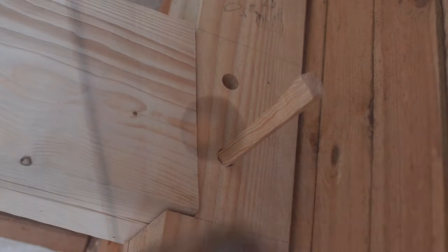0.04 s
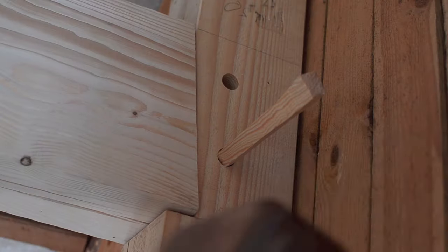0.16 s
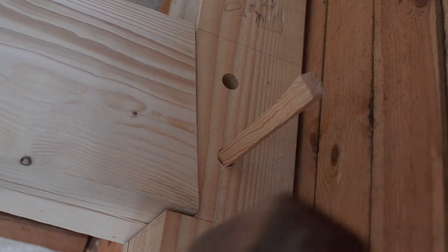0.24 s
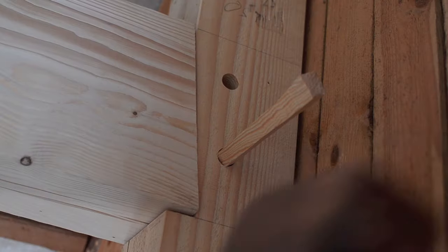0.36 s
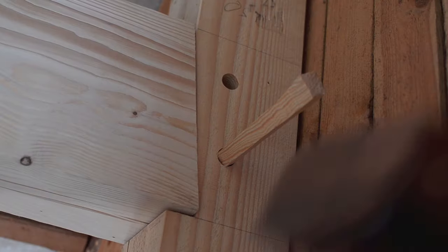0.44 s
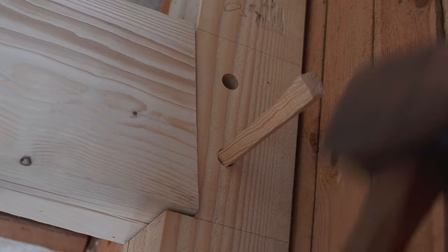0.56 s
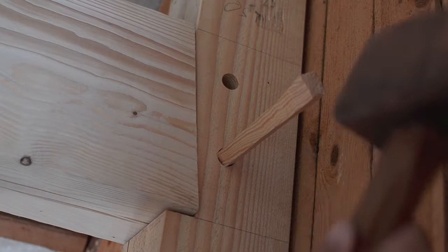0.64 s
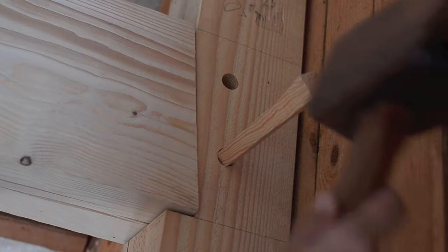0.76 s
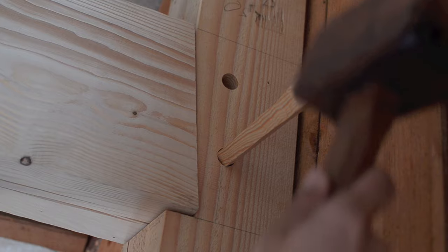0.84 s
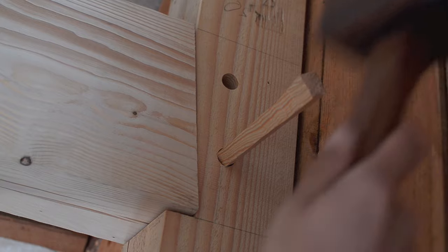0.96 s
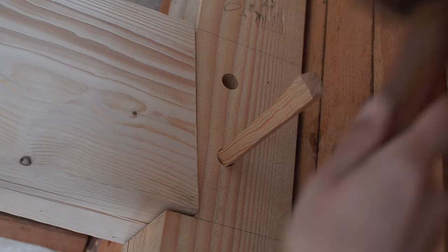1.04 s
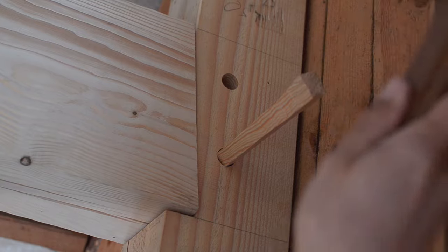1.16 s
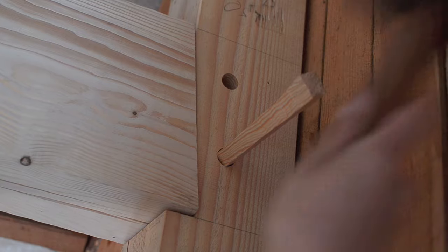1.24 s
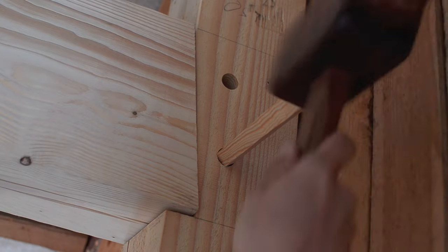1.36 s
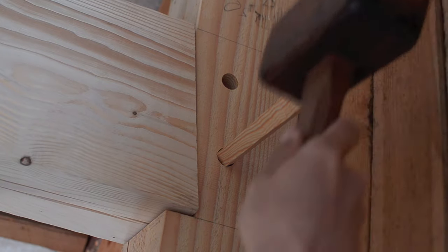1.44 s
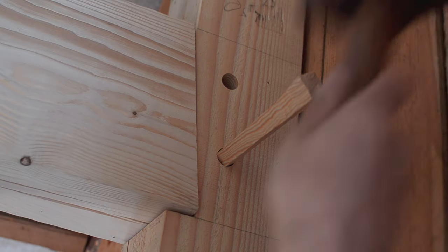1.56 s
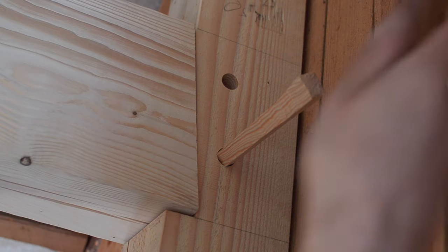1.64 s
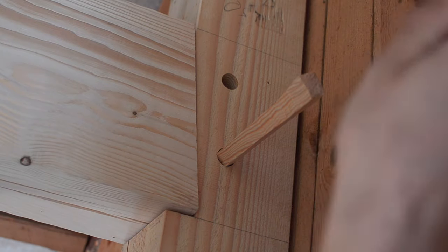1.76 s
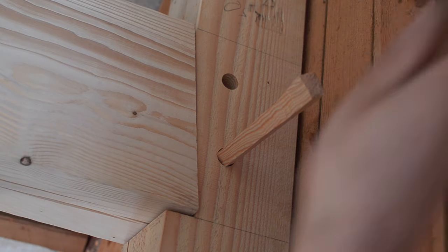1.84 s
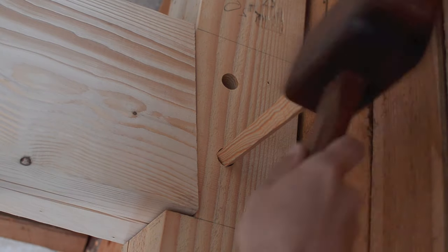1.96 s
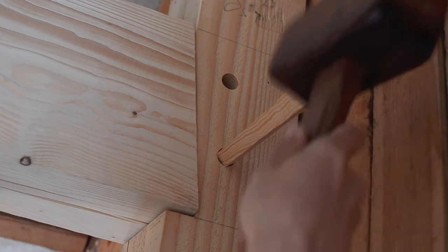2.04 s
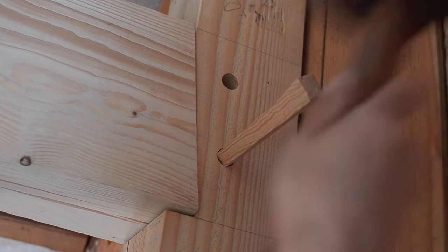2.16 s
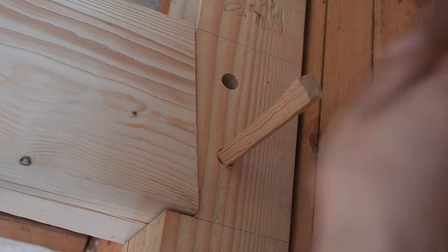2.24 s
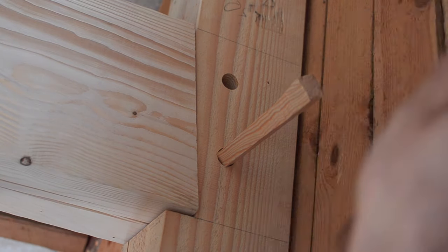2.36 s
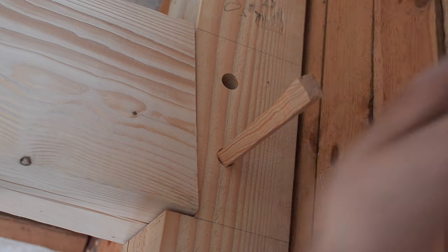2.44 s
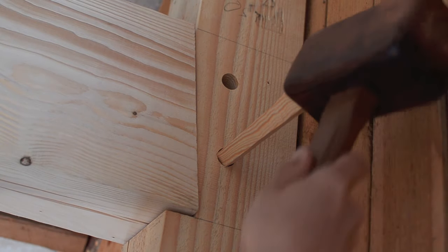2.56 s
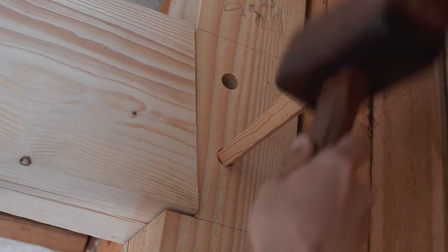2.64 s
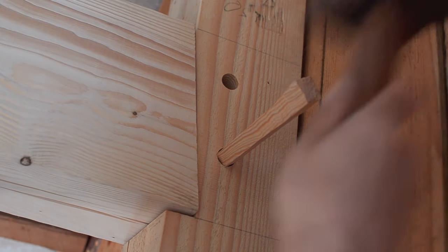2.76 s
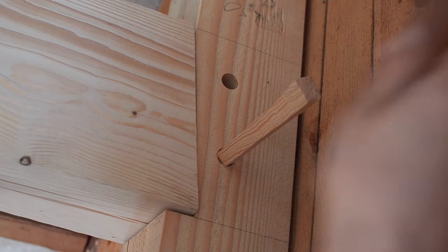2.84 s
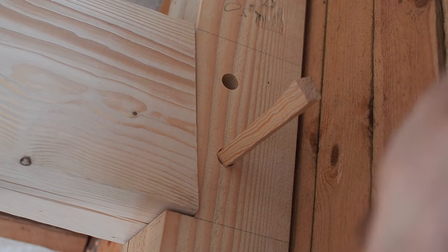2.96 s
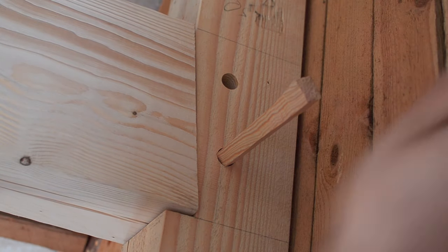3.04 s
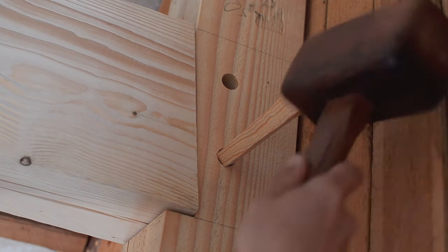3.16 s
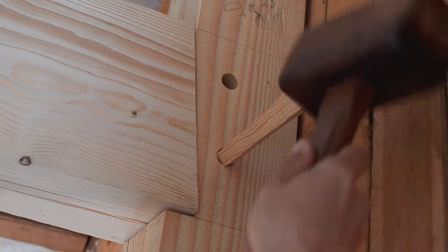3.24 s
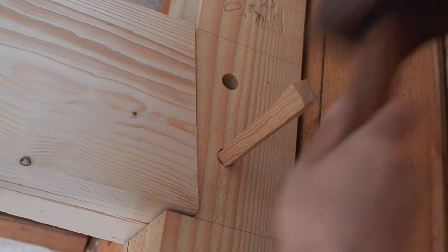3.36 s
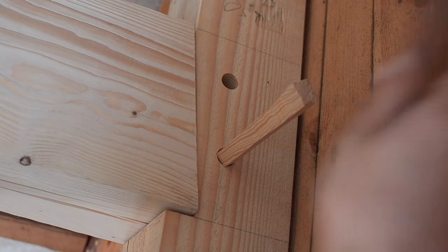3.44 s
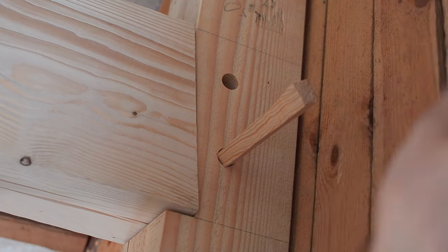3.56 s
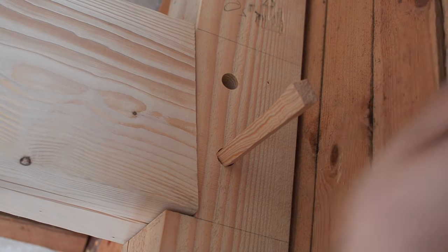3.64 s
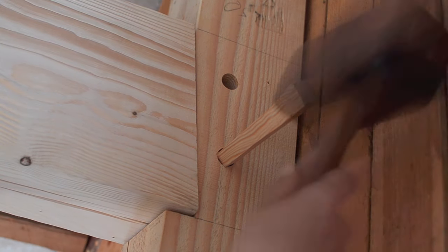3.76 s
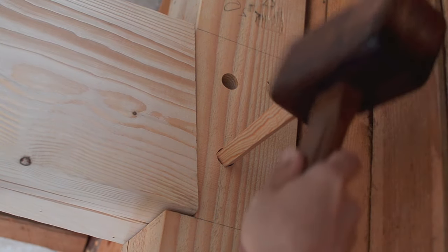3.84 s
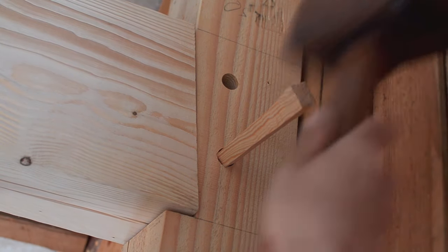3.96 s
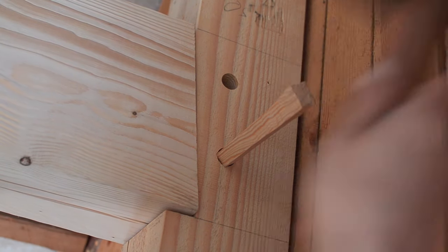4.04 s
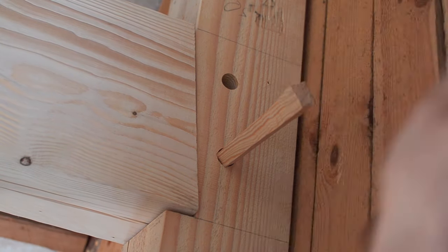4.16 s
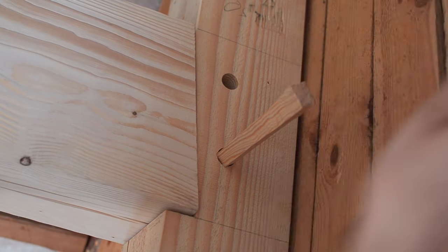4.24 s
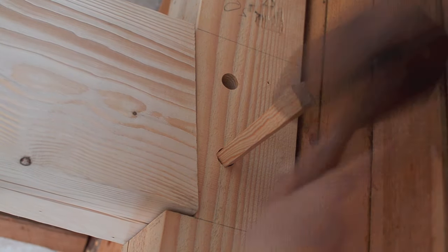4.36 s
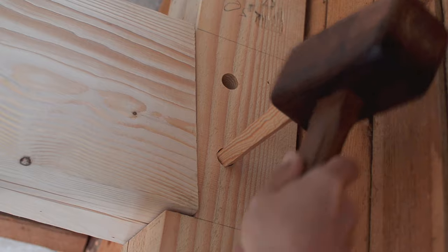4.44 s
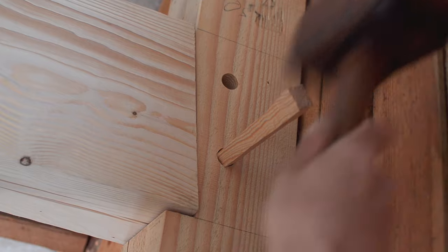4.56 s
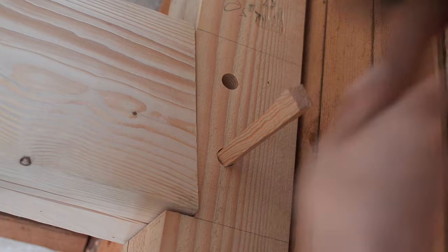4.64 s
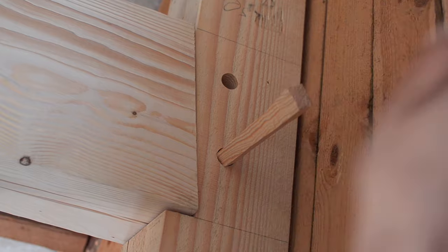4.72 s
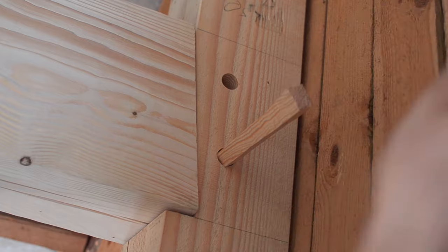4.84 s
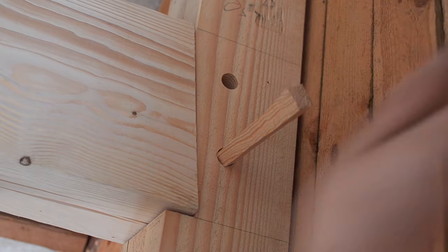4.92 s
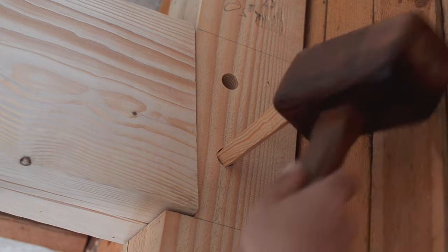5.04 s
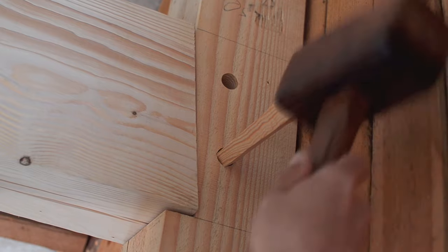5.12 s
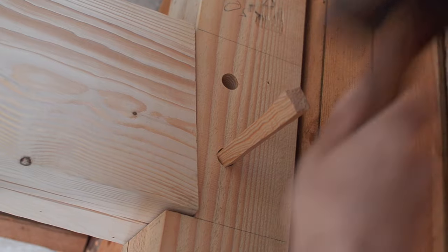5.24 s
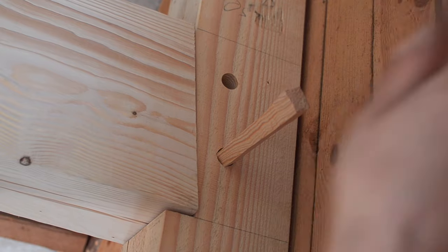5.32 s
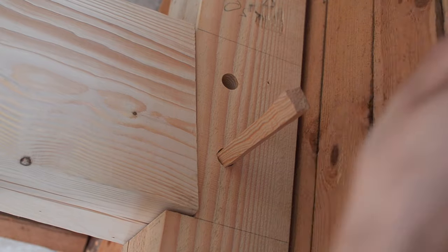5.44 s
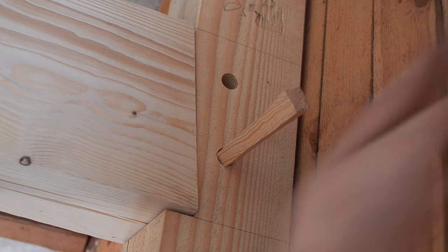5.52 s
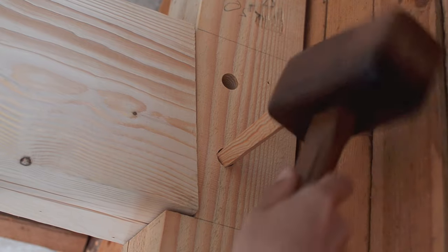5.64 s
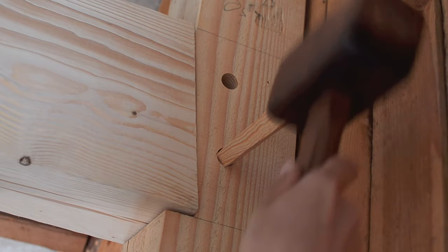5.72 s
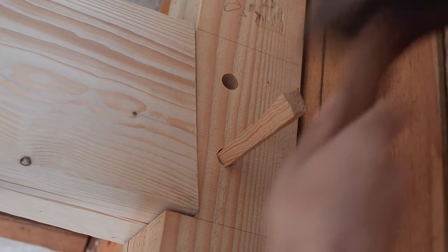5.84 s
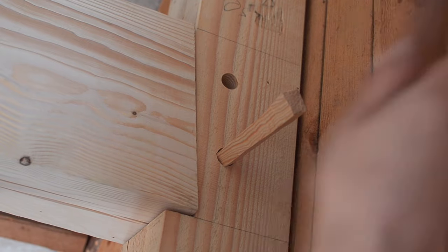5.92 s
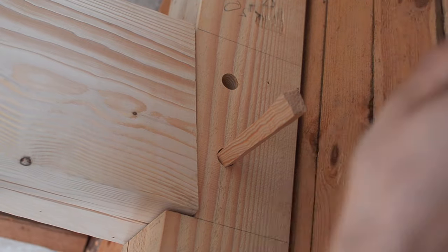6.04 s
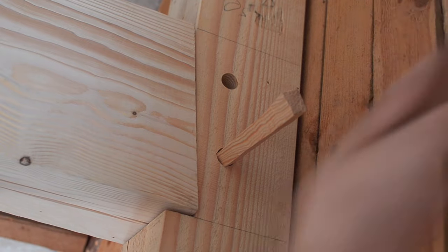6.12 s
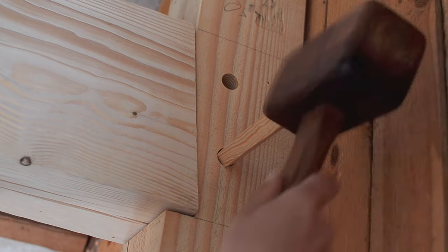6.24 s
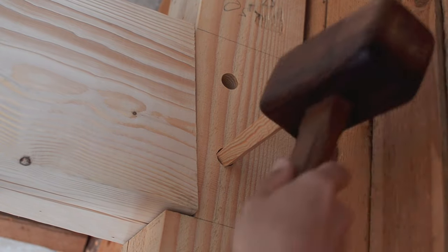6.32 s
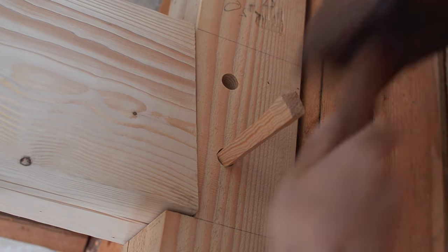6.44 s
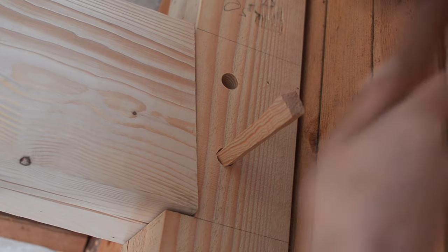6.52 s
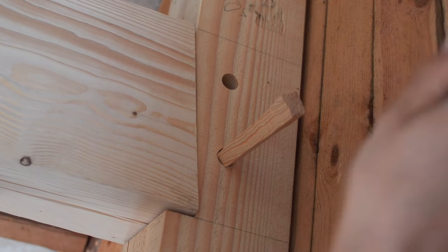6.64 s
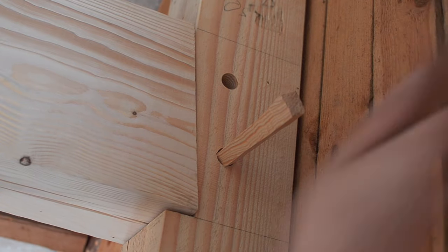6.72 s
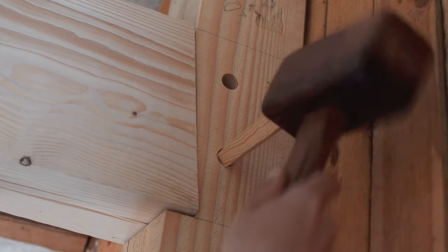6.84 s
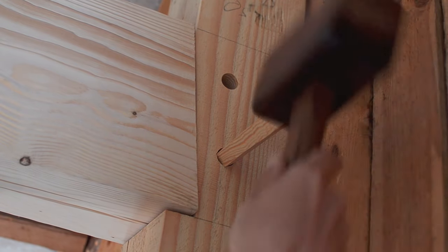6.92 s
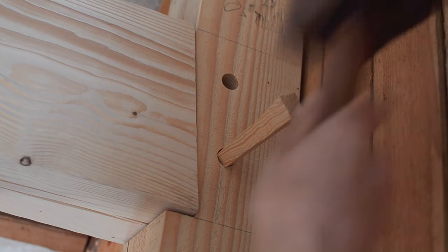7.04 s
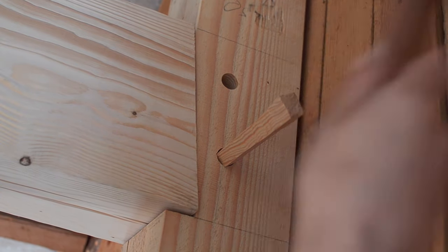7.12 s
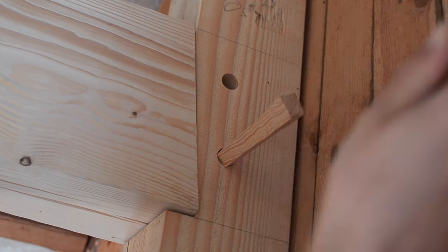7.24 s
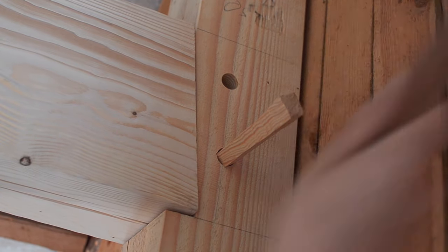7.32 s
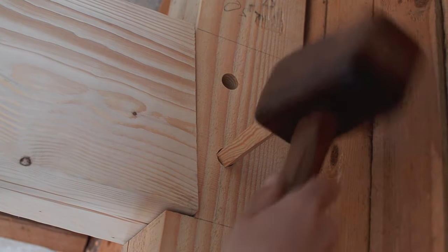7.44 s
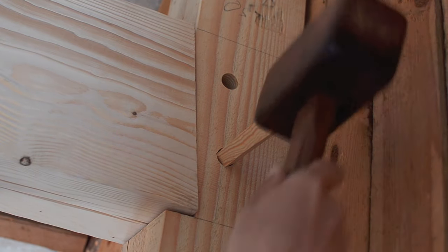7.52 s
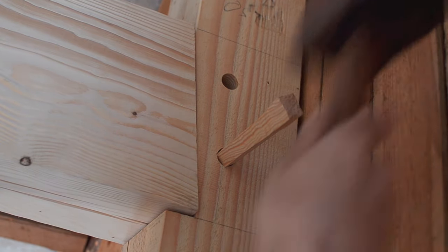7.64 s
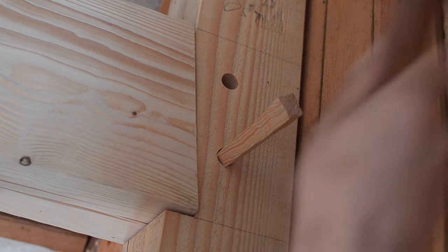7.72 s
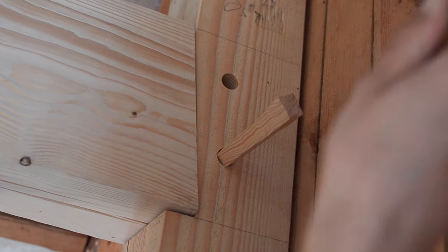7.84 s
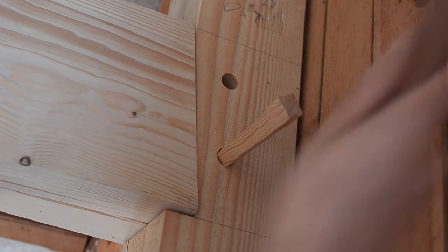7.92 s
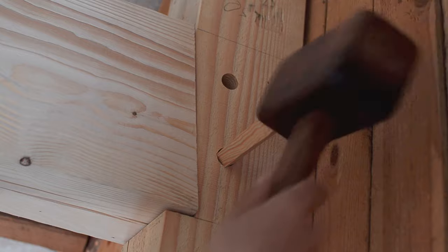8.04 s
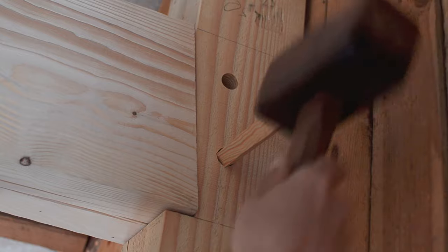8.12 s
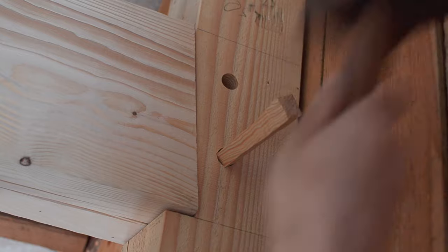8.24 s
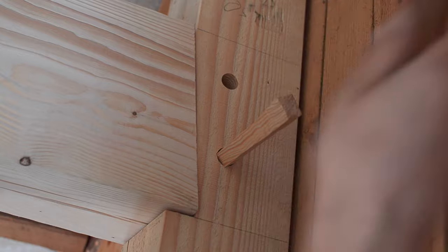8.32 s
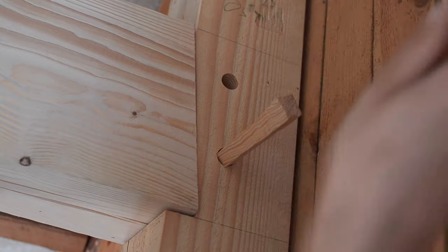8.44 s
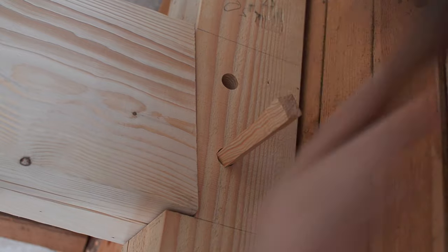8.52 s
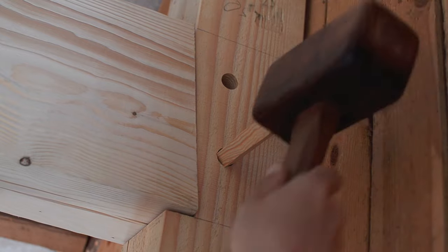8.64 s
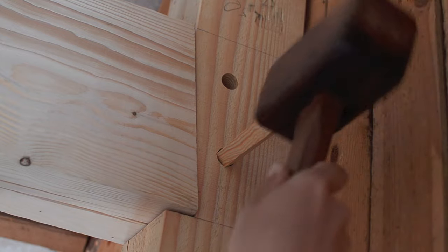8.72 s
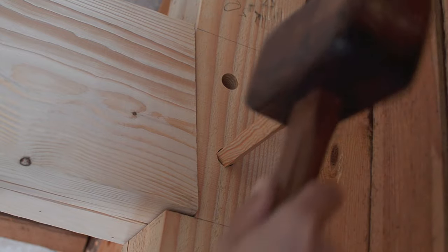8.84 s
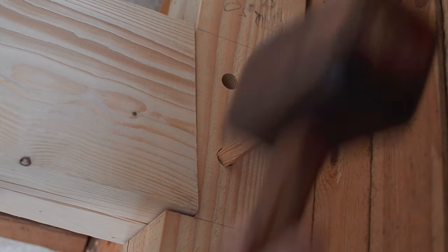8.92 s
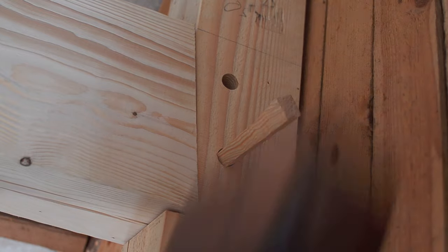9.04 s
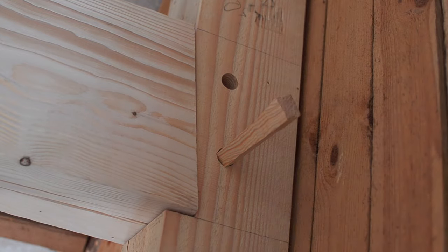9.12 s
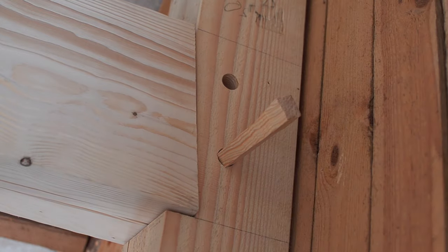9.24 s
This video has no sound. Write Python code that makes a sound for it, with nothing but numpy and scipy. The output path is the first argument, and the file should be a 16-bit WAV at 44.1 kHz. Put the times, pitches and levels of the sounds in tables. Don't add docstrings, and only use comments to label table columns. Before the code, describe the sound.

After more than a second of quiet room tone and faint cloth rustle, a wooden mallet strikes a peg thirteen times at an even pace. Each blow is a hard, very short woody crack, close and slightly overloaded, with a little fibre crunch. A big bare hall answers with the same reverberant tail, soft wall slaps and a late low boom.

```python
import sys
import numpy as np
from scipy import signal
from scipy.io import wavfile

SR = 44100
rng = np.random.default_rng(int(sys.argv[2]) if len(sys.argv) > 2 else 0)


def convert_level_to_amplitude(level_db):
    exponent = np.asarray(level_db, float) / 20
    return 10 ** exponent


def persist_wave(psi):
    counts = np.round(np.clip(psi, -1, 1) * 32767).astype(np.int16)
    wavfile.write(sys.argv[1], SR, np.atleast_2d(counts).T)


N = 409248

STRIKE_TIMES = [1.3788, 2.0118, 2.5999, 3.2137, 3.8341, 4.4398, 5.0648, 5.6555, 6.2761, 6.8611, 7.4600,
                8.0770, 8.6419]
# (strength into the hall [dB], bite [-1 loose to 1 tight], glance off the peg's axis [dB],
# crack of the mallet face [dB])
BLOWS = [(-5, 0.84, -1, 4), (-2, -.1, -0.5, -1.5), (-0.5, -0.82, -4.5, -5.5), (-2, -1.4, -3.5, -1),
         (-1, -0.42, -3, -2), (-3, -.6, 1.5, 0.5), (-1.5, -1.5, 1.5, -1.5), (-3, 0.28, 2, 3),
         (0, 0.19, 2.2, -1), (-0.5, 0.34, -2, 0), (-0.5, .6, 0, 1), (0, 0.32, -0.8, 1), (-1, 1.1, -1.8, 2)]

BEAM_MODES = [(218.1, -12, 0.041), (300.6, -16, 0.063), (368, -7, 0.018), (786, -23, 0.0094)]
# (frequency [Hz], level [dB], t60 [s])
PEG_MODES = [(150, -18, .037), (455, -13, 0.036), (508, -8.5, .04), (956, -7.5, 0.016), (1147, 3, 0.014),
             (1185, 6.5, 0.01)]
# (frequency [Hz], level [dB], t60 [s])
SIDEWAYS_MODES = [(1314, -5, 0.024), (1443, -2, 0.0083)]
# (frequency [Hz], level [dB], t60 [s])
CRACK_MODES = [(1659, -5, 0.013), (1707, -2, 0.01), (1857, -2.5, 0.0098), (2174, 10, 0.0051),
               (3190, -4, 0.0069), (4310, -8.5, 0.0081), (5700, -18.5, 0.0013), (7000, -9.5, 0.0018)]
# (frequency [Hz], level [dB], t60 [s])
FRAME_MODES = [(406.6, -8, 0.065), (594, -17, 0.054), (757, -13, 0.035), (862, -14, 0.06),
               (1890, -13, 0.005), (2630, -9, 0.017)]

# (delay [s], left level [dB], right level [dB])
NEAR_ECHOES = [
    (.0037, -16.5, -21.5),
    (.0088, -20.5, -16),
    (0.0136, -26, -18.5),
]
# (frequency [Hz], t60 [s], build-up [s], colour [dB], left-right likeness [0-1])
HALL_BANDS = [(105, 1, 0.043, -9.5, 0.9), (192, 1.4, 0.015, 3.5, 0.86), (285, 0.96, 0.023, 0.5, 0.63),
              (590, 0.87, 0.024, 5.5, .82), (1200, 0.65, 0.03, 5.5, 0.85), (2800, 0.47, 0.0024, 1.5, .82),
              (4810, 0.51, 0.0035, -1.5, 1), (13300, .18, 0.0049, -11.5, 0.55)]
# (delay [s], length [s], level [dB], frequency [Hz])
WALL_SLAPS = [
    (0.027, .012, -47, 224.5),
    (.06, 0.052, -52, 152.1),
    (0.118, 0.011, -47.5, 285),
    (0.14, 0.03, -51.5, 224),
    (.21, 0.06, -60, 150),
]
# (frequency [Hz], level per Hz [dB])
SHAKE_SPECTRUM = [(12, -5), (25, -3), (50, -3), (90, -7), (125, 2.5), (150, -55.5)]
# (delay [s], length [s], level [dB], frequency [Hz])
SWELLS = [
    (.22, 0.025, -40, 58.3),
    (.39, 0.06, -41.5, 46.04),
]

# (frequency [Hz], level per Hz [dB])
AIR_SPECTRUM = [(25, -2.5), (60, -10), (130, -1), (500, 0.2), (1700, -5.5), (3000, -11.5), (6000, -23.5),
                (15000, -26)]
# (frequency [Hz], left-right likeness [0-1])
AIR_LIKENESS = [(60, 0.45), (240, 0.37), (950, 0.21), (3770, 0.66), (15000, 0.77)]
# (time [s], length [s], level [dB], centre [Hz], width [octaves])
RUSTLES = [
    (0.036, 0.029, -65, 114, 0.46),
    (.01, 0.022, -69.5, 1100, 1),
    (.165, .025, -73, 1900, 0.82),
    (.255, .03, -73, 2600, 0.64),
    (0.15, .13, -67, 39, 0.59),
    (.87, 0.045, -73.5, 490, 0.95),
    (3.095, .015, -79, 4050, .6),
]

AIR_DB, AIR_EDGE_HZ = -63, 15900
BEAMS_DB, BEAMS_BITE_DB, PEG_DB, SIDEWAYS_DB, FRAME_DB = -1.5, 7.5, -1.5, 0.5, -1
SEATING_S, FRAME_DB_PER_S, PEG_DB_PER_S = 4.7, 3, -2.5
DEEP_DB, FACING_DB, HIDDEN_DB = 3, 1, -6
SPREAD_DB, DETUNE = 1.3, 0.008
SPLINTER_DB, SPLINTER_T60_S, SPLINTER_LOW_HZ, SPLINTER_TOP_HZ = -19, 0.035, 3000, 6500
SHAKE_DB, SHAKE_LIKENESS = -45.5, 0.85
PORT_LAG_S = 3.6e-5
LIMIT_DB, SQUEEZE, GRAB_S, LET_GO_DB_PER_S = 5, 0.37, 0.0005, 303.5


def evened(x):
    return x / np.sqrt(np.mean(x ** 2) + 1e-20)


def read(points, hz, column=1):
    table = np.transpose(points)
    return np.interp(np.log(hz + 1), np.log(table[0] + 1), table[column])


def bell(x, centre, width):
    return np.exp(-0.5 * ((x - centre) / width) ** 2)


def noise(length, size, magnitude, same):
    hop = size // 4
    hz = np.fft.rfftfreq(size, 1 / SR)[:, None]
    s = np.arange(length // hop + 5) * hop / SR
    a, b, c, d = rng.standard_normal((len(s), len(hz), 4)).T
    like = np.clip(same(hz), 0, 1)
    common = np.sqrt(0.5 + like / 2) * (a + 1j * b)
    apart = np.sqrt(0.5 - like / 2) * (c + 1j * d)
    z = np.array([common + apart, common - apart]) * magnitude(hz, s)
    return signal.istft(z, nperseg=size, noverlap=size - hop)[1][:, :length]


def air():
    def tone_level(hz, s):
        return convert_level_to_amplitude(read(AIR_SPECTRUM, hz)) * (hz < AIR_EDGE_HZ) + 0 * s

    def rustle_level(hz, s):
        power = 0
        for at, length, db, centre_hz, octaves in RUSTLES:
            swell = bell(s, at, length) ** 2
            colour = bell(np.log2(hz + 1), np.log2(centre_hz), octaves) ** 2
            power = power + convert_level_to_amplitude(2 * db) * swell * colour / (centre_hz * octaves)
        return np.sqrt(power)

    tone = evened(noise(N, 2048, tone_level, lambda hz: read(AIR_LIKENESS, hz)))
    rustles = noise(N, 512, rustle_level, lambda hz: 0.85 + 0 * hz) / np.sqrt(512)
    return convert_level_to_amplitude(AIR_DB) * tone + convert_level_to_amplitude(56) * rustles


def ring(modes, t, luck, damping):
    hz, db, t60 = np.transpose(modes)[:, :, None]
    louder, sharper = luck[:, :len(modes), None]
    level = convert_level_to_amplitude(db + SPREAD_DB * louder - 60 * damping * t / t60)
    return -(level * np.sin(2 * np.pi * hz * (1 + DETUNE * sharper) * t)).sum(0)


def blow(drive_db, chance, damping, contact_s, cut_hz):
    t = np.arange(SR // 4) / SR
    parts = zip((BEAM_MODES, PEG_MODES, SIDEWAYS_MODES, CRACK_MODES, FRAME_MODES), drive_db, chance)
    wood = sum(convert_level_to_amplitude(db) * ring(modes, t, luck, damping) for modes, db, luck in parts)
    contact = bell(t[:32], 16 / SR, contact_s)
    wood = signal.oaconvolve(wood, contact / contact.sum())[8:]
    return signal.lfilter(*signal.butter(2, cut_hz, "high", fs=SR), wood)


def splinters(count):
    t = np.arange(SR // 20) / SR
    band = signal.butter(1, [SPLINTER_LOW_HZ, SPLINTER_TOP_HZ], "band", fs=SR)
    fizz = signal.lfilter(*band, rng.standard_normal((count, len(t))))
    return fizz * convert_level_to_amplitude(SPLINTER_DB - 60 * t / SPLINTER_T60_S)


def near_echoes(direct):
    taps = np.zeros((2, 1200))
    for delay, left_db, right_db in NEAR_ECHOES:
        taps[:, round(delay * SR) + 8] = convert_level_to_amplitude(np.array([left_db, right_db]))
    taps = signal.lfilter(*signal.butter(3, 2200, fs=SR), taps)
    lag = np.arange(-8, 12) - np.array([[0], [PORT_LAG_S * SR]])
    taps[:, :20] = np.sinc(lag) * bell(lag, 0, 4)
    return signal.oaconvolve(direct[None], taps, axes=1)[:, :N]


def bursts(table, t):
    return sum(convert_level_to_amplitude(db) * bell(t, at, width) * np.cos(2 * np.pi * hz * t) for at, width, db, hz in table)


def hall():
    def magnitude(hz, s):
        build = 1 - np.exp(-s / np.maximum(read(HALL_BANDS, hz, column=2), 1e-3))
        fade = convert_level_to_amplitude(read(HALL_BANDS, hz, column=3) - 60 * s / read(HALL_BANDS, hz))
        return (hz > 100) * build * fade

    t = np.arange(3 * SR // 2) / SR
    tail = noise(len(t), 512, magnitude, lambda hz: read(HALL_BANDS, hz, column=4))
    tail = tail * np.clip(t / 0.0033, 0, 1)
    return tail / np.linalg.norm(tail[0]) + bursts(WALL_SLAPS, t)


def building():
    def magnitude(hz, s):
        return convert_level_to_amplitude(read(SHAKE_SPECTRUM, hz)) + 0 * s

    t = np.arange(SR) / SR
    rumble = evened(noise(SR, 4096, magnitude, lambda hz: SHAKE_LIKENESS + 0 * hz))
    shape = (1 - np.exp(-t / 0.031)) * convert_level_to_amplitude(-60 * t / 6.1) * np.clip((1 - t) / 0.67, 0, 1)
    shake = convert_level_to_amplitude(SHAKE_DB) * rumble * shape + bursts(SWELLS, t)
    strikes = np.zeros((1, N))
    strikes[0, np.round(np.array(STRIKE_TIMES) * SR).astype(int)] = 1
    return signal.fftconvolve(strikes, shake, axes=1)[:, :N]


def scene():
    direct, sends = np.zeros(N), np.zeros((2, N))
    chance = rng.standard_normal((len(BLOWS), 5, 2, 8))
    fizzes = splinters(count=len(BLOWS))
    for s, landing, luck, fizz in zip(STRIKE_TIMES, BLOWS, chance, fizzes):
        strength_db, bite, glance_db, square_db = landing
        seated = max(s - SEATING_S, 0)
        drive_db = (BEAMS_DB + BEAMS_BITE_DB * bite, PEG_DB + PEG_DB_PER_S * seated,
                    SIDEWAYS_DB + glance_db, square_db, FRAME_DB + FRAME_DB_PER_S * seated)
        close_db = np.add(drive_db, (DEEP_DB, 0, 0, FACING_DB, HIDDEN_DB))
        at = round(s * SR) - 9
        sound = convert_level_to_amplitude(9) * blow(close_db, luck, damping=0.74, contact_s=2e-5, cut_hz=420)[:N - at]
        blurred = blow(drive_db, luck, damping=2.05, contact_s=1e-5, cut_hz=134)[:N - at]
        direct[at - 8:at - 8 + len(sound)] += sound
        direct[at:at + len(fizz)] += fizz
        turn = 0.2 * s
        sends[:, at:at + len(sound)] += np.outer([np.cos(turn), np.sin(turn)], convert_level_to_amplitude(strength_db - 7.5) * blurred)
    far = sum(signal.fftconvolve(send[None], hall(), axes=1)[:, :N] for send in sends)
    balance = convert_level_to_amplitude(np.array([[-0.4], [0.4]]))
    return near_echoes(direct) + convert_level_to_amplitude(-5.5) * far * balance + building() + air()


def top_cut(x):
    return signal.sosfilt(signal.butter(12, 16520, fs=SR, output="sos"), x)


def record(dry):
    keep = np.exp(-1 / (GRAB_S * SR))
    power = signal.lfilter([1 - keep], [1, -keep], (dry ** 2).max(0))
    level_db = 10 * np.log10(power + 1e-12)
    fall_db = np.arange(N) * LET_GO_DB_PER_S / SR
    held_db = np.maximum.accumulate(level_db + fall_db) - fall_db
    over_db = np.maximum(held_db - LIMIT_DB, 0)
    mix = np.clip(dry * convert_level_to_amplitude(-SQUEEZE * over_db), -1, 1)
    return top_cut(mix)


dry = scene()
out = record(dry)
persist_wave(out)
```